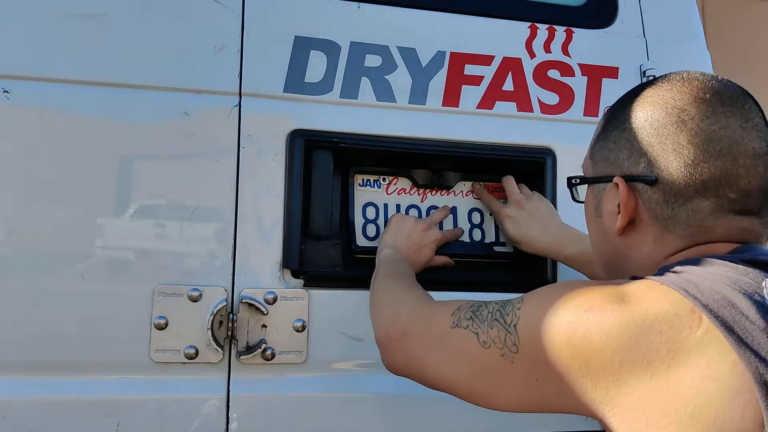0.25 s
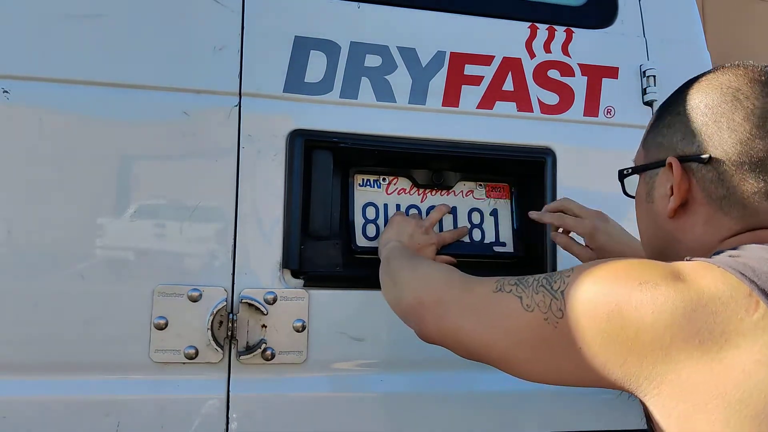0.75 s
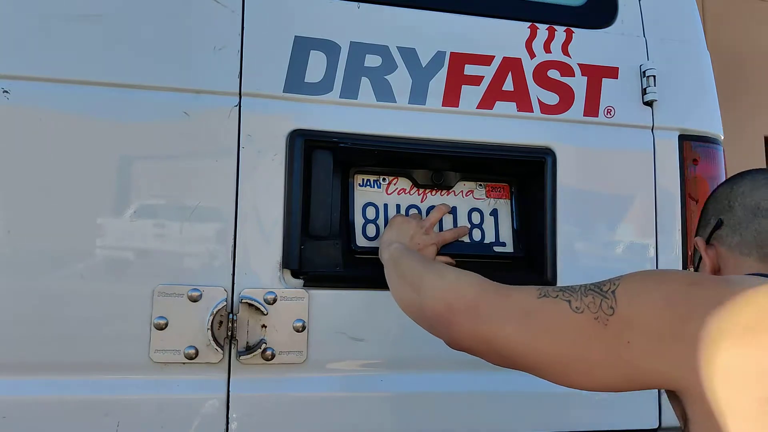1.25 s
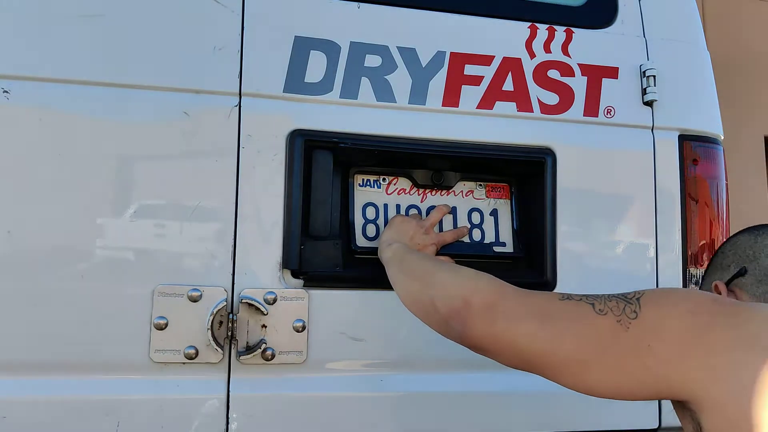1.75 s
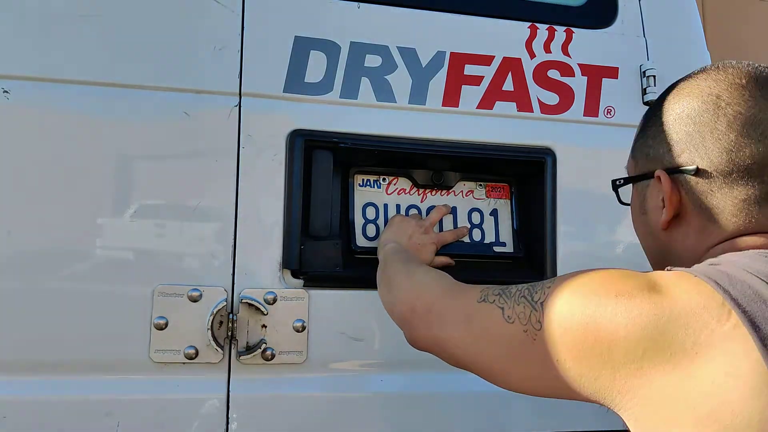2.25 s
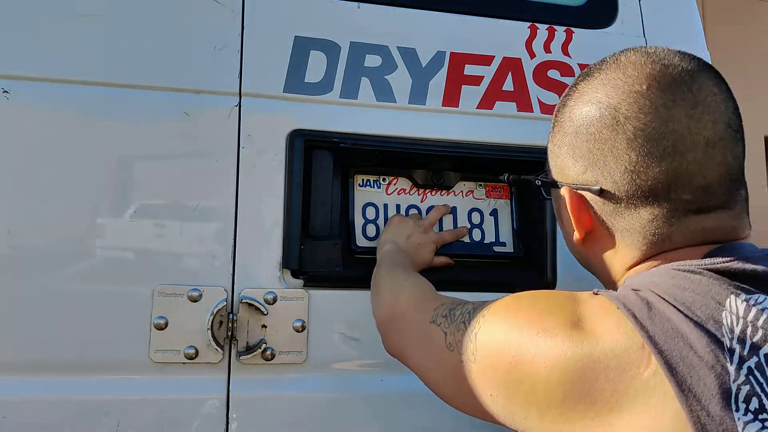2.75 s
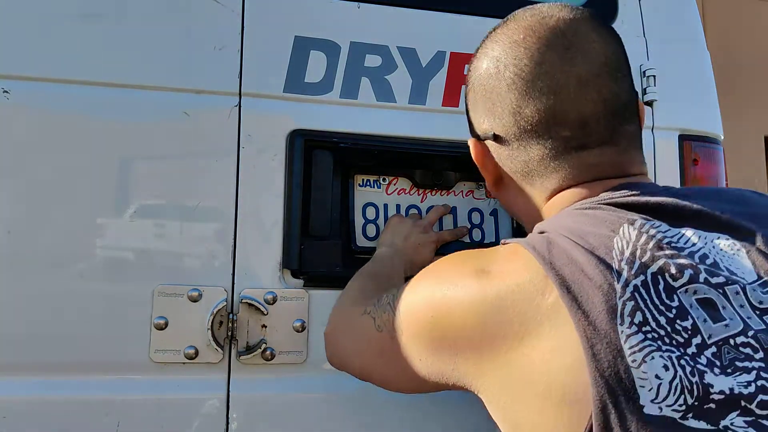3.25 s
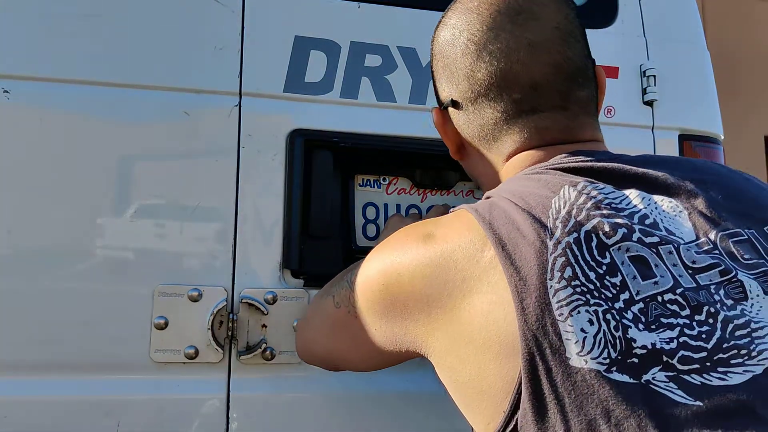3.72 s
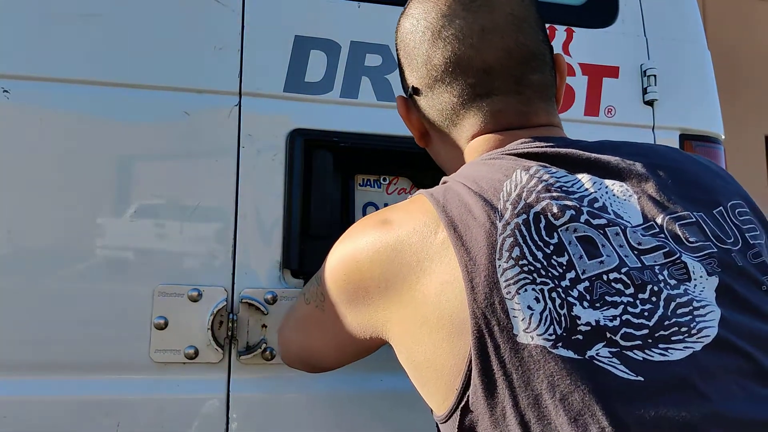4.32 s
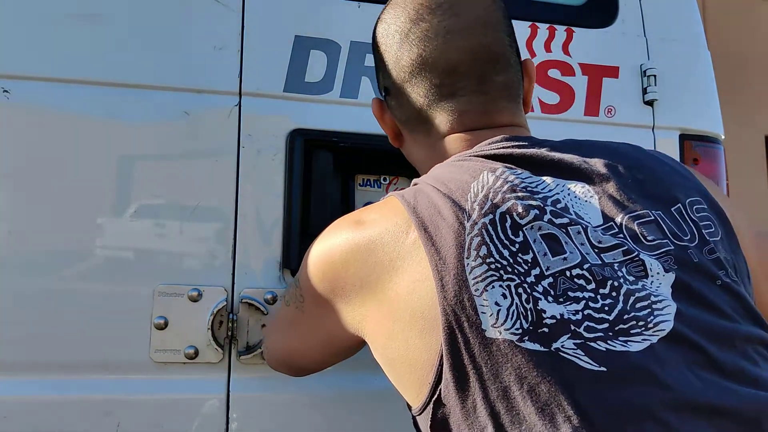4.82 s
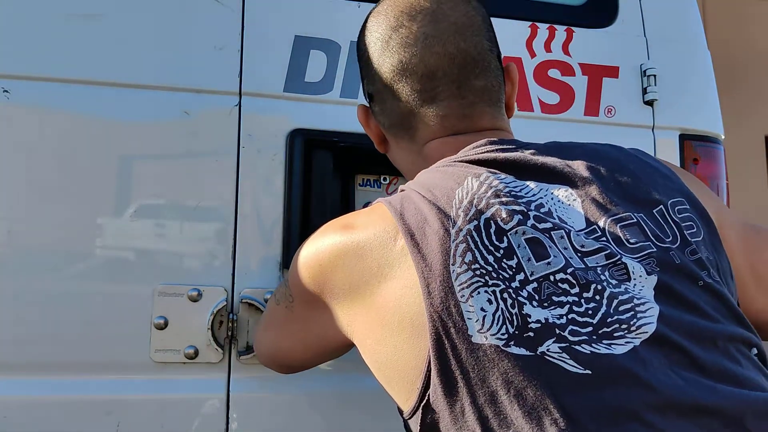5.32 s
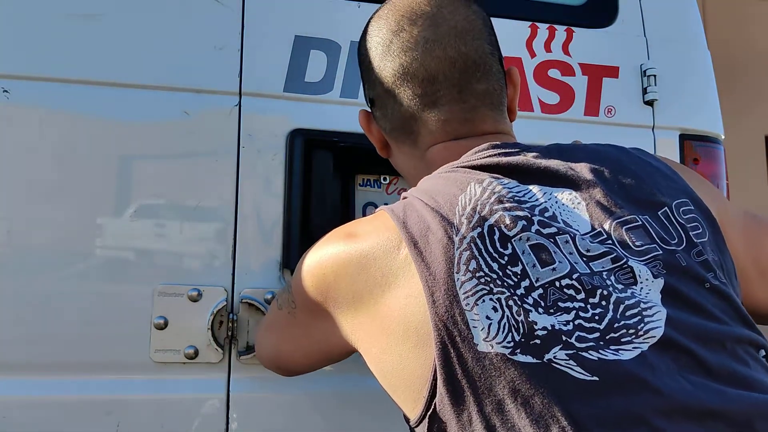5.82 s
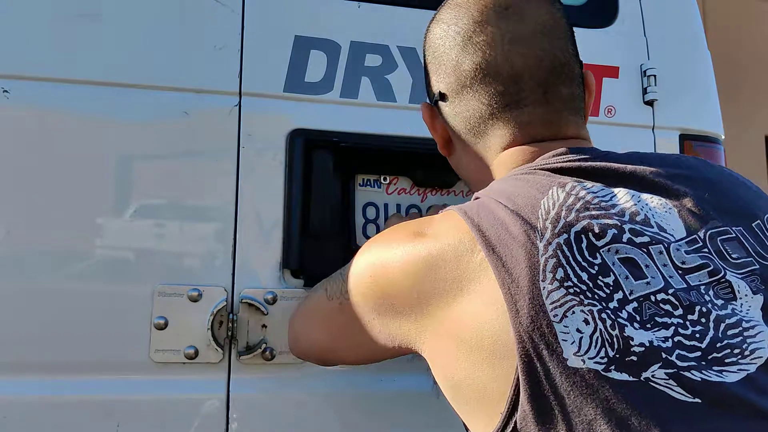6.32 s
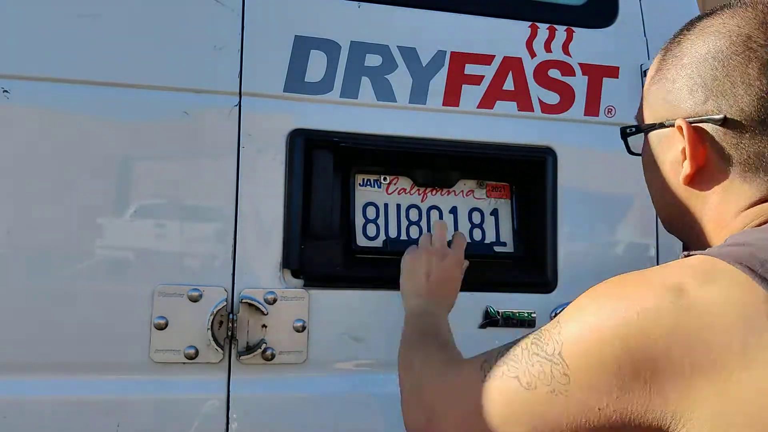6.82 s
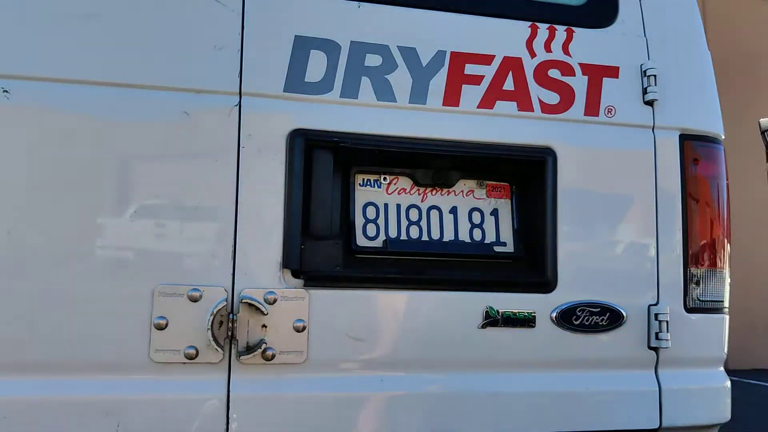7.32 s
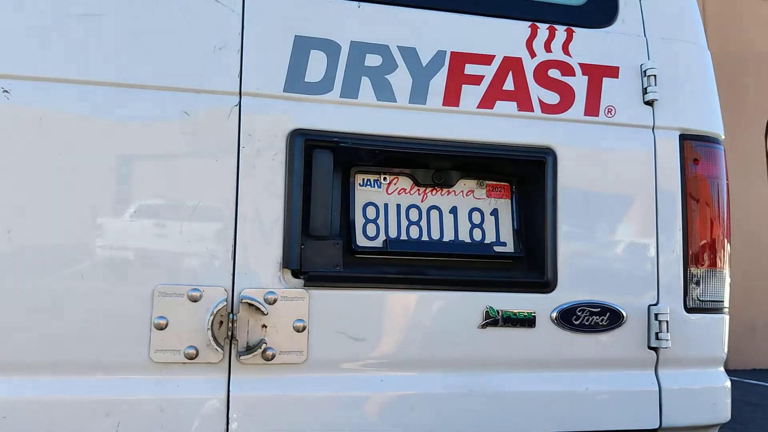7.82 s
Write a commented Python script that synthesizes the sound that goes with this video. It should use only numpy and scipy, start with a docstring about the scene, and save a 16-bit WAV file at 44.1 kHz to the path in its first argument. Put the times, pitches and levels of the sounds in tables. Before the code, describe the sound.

Outdoors, low distant traffic rumble runs throughout, with an engine drone easing off over the first three seconds. Close and slightly left, faint taps on a plate come at 0.1-0.4 s, then a flurry of small plastic clicks at 0.5-0.85 s, the last firmest. A soft knock at 1.4, a bright hard double clack at 1.96, sparse light knocks at 3.3-3.4 and 4.0-4.2. At 4.72 a bit clunks into a screw; at 4.76 an impact driver spins up quickly to a high whine, then sags and growls from 5.0 as the thread rasps and binds in rising scrapes. Short squeals at 5.75-5.93 lead to a light blow at 5.94 and three loud metallic bangs at 5.96-6.06, ringing the steel door. The motor coasts down from 6.1, with rattles and a sharp bit slip at 6.3. Faint rustles and knocks until 7.2, then rumble and two tiny ticks at 8.0.

```python
"""Licence plate frame screwed to a van door

A plastic licence plate frame clicks against a van's rear door outdoors, over low traffic rumble and engine drone.
A cordless impact driver clacks, seats on a screw and runs: motor harmonics sag over gear noise and thread rasp.
The screw scrapes and squeals, the hammer gives a light blow and three hard ones, the door rings, the bit slips off.
Contacts are decaying noise bands and struck modes; friction is noise through resonances; the door is decaying sines."""
import sys
import numpy as np
from scipy import signal
from scipy.io import wavfile

SR = 44100
rng = np.random.default_rng(int(sys.argv[2]) if len(sys.argv) > 2 else 0)


def materialize(psi):
    """Save the field psi as 16-bit PCM at rate SR to the path in sys.argv[1].

    A 1-D psi becomes a single channel; in a 2-D psi each row is a channel.
    """
    bounded = np.clip(np.atleast_2d(psi).T, -1, 1)
    quanta = np.round(bounded * 32767).astype(np.int16)
    wavfile.write(sys.argv[1], SR, quanta)


N = 355446
TIME = np.arange(N) / SR
# neighbouring noise bands, 0.4 octave each
EDGES = 22 * 2 ** (np.arange(25) * .4)
CENTRES = np.sqrt(EDGES[:-1] * EDGES[1:])
BANK = [signal.butter(2, pair, "band", fs=SR, output="sos") for pair in zip(EDGES, EDGES[1:])]

# stereo image of the near sounds: pitch_hz, left_right_likeness (-1 to 1)
NEAR_IMAGE = [(200, 0.99), (600, 0.91), (1100, 0.76), (3000, 0.23), (6000, .08), (12000, -0.2)]
# the bit drops into the screw head: start_s, level_db (relative), tilt_db_per_octave, t60_s (at 2 kHz)
SEAT_HITS = [(4.7215, -33, -4, 0.019), (4.7255, -23, 0.5, 0.064), (4.744, -40, -4.5, 0.09)]
# hammer blows: start_s, level_db (relative)
HAMMER_BLOWS = [(5.9387, -23.5), (5.959, -10), (6.0091, -10), (6.055, -9)]
# the thread binds in the plastic: peak_s, build_s, release_s (Gaussian spreads), level_db
THREAD_BINDS = [(5.055, 0.026, 0.033, -45.5), (5.232, 0.032, 0.03, -38), (5.442, 0.048, 0.018, -38.5),
                (5.659, 0.056, 0.026, -39), (5.803, 0.019, 0.015, -30.5), (5.908, .02, 0.019, -30)]

# trigger pulled, thread bites, head meets the frame, trigger let go, rotor at rest (s)
START_S, BITE_S, TIGHT_S, RELEASE_S, REST_S = 4.76, 4.958, 5.715, 6.095, 6.75


def from_db(db):
    """Decibels to gain."""
    return 10 ** (np.asarray(db) / 20)


def rms_one(x):
    """Scale to unit rms."""
    return x / np.sqrt(np.mean(x ** 2) + 1e-20)


def in_time(rows):
    """The columns of a curve at every sample."""
    s, *columns = np.transpose(rows)
    return [np.interp(TIME, s, column) for column in columns]


def during(start, end):
    """One between two moments, with 20 ms ramps inside the ends."""
    return np.clip(np.minimum(TIME - start, end - TIME) / .02, 0, 1)


def step(s, length):
    """A smooth rise from 0 to 1, centred on a moment."""
    return (1 + np.tanh(2 * (TIME - s) / length)) / 2


def stages(first, changes):
    """A value that glides to a new one at each change of (centre_s, length_s, value)."""
    out = first
    for s, length, value in changes:
        out = out + (value - out) * step(s, length)
    return out


def grip(s, build, release):
    """A bell that builds up to a moment and lets go, each at its own rate, as friction does."""
    spread = np.where(TIME < s, build, release)
    return np.exp(-np.minimum(((TIME - s) / spread) ** 2, 100) / 2)


def swells(rows):
    """Bell-shaped rises and falls of gain."""
    return sum(from_db(db) * grip(s, spread, spread) for s, spread, db in rows)


def at_hz(points, hz):
    """Read a spectrum on a log-frequency axis."""
    f, value = np.transpose(points)
    return np.interp(np.log(hz), np.log(f), value)


def band_gains(spectrum):
    """Amplitude of each band, falling steeply outside the spectrum; total power 1."""
    octaves_outside = np.abs(np.log2(CENTRES / np.clip(CENTRES, spectrum[0][0], spectrum[-1][0])))
    density = from_db(at_hz(spectrum, CENTRES) - 20 * octaves_outside)
    gains = density * np.sqrt(CENTRES)   # bands widen with pitch
    return gains / np.linalg.norm(gains)


def drift(rate):
    """Smooth random wandering of rms 1, with this many turning points per second at most."""
    knots = rng.standard_normal(8192)
    return rms_one(np.interp(TIME * rate, np.arange(len(knots)), knots))


def stereo(pair, likeness, hz):
    """Mix two unrelated noises into a left and right that are alike by a set amount."""
    alike = np.clip(at_hz(likeness, hz), -.99, .99)
    middle = np.sqrt((1 + alike) / 2) * pair[0]
    side = np.sqrt((1 - alike) / 2) * pair[1]
    return middle + side * [[1], [-1]]


def resonance(x, hz, width):
    """A two-pole band-pass with gain of about 1 on top."""
    r = np.exp(-np.pi * width / SR)
    numerator = np.array([1, 0, -1]) * (1 - r * r) / 2
    denominator = [1, -2 * r * np.cos(2 * np.pi * hz / SR), r * r]
    return signal.lfilter(numerator, denominator, x + 1e-18)


def noise(spectrum, likeness):
    """Coloured stereo noise of rms 1, built band by band."""
    white, out = rng.standard_normal((2, 2, N)), 0
    for k, gain in enumerate(band_gains(spectrum)):
        if gain > 1e-4:
            band = rms_one(signal.sosfilt(BANK[k], white[k % 2]))
            out = out + gain * stereo(band, likeness, CENTRES[k])
    return rms_one(out)


def struck(hz, width, angle, t):
    """One mode dying away after each contact, a little out of phase between left and right."""
    scatter, phase = rng.standard_normal((len(angle), 2)).T[:, :, None, None]
    force = from_db(1.2 * scatter)   # no two contacts strike a mode equally hard
    swing = force * 2 * np.pi * width / SR * np.exp(-np.pi * width * t)
    return swing * np.cos(2 * np.pi * (hz * t + phase) + angle[:, :, None] * [[.5], [-.5]])


def contacts(rows, colour, modes, level_db, mode_db, share, low_ring, tail_db, tail_t60):
    """Each contact rings the main modes and a crowd of short ones, lows longest, then a faint scatter from the yard."""
    t = np.arange(SR // 3) / SR
    s, db, tilt, t60 = np.transpose(rows)[:, :, None]
    # the same body rings much alike at every contact
    share = np.clip(share, 0, 1)
    common = rng.standard_normal((2, 2, len(t)))
    own = rng.standard_normal((len(rows), 2, 2, len(t)))
    crowd = np.sqrt(share) * common + np.sqrt(1 - share) * own
    hits, gains = 0, band_gains(colour)
    for k, (hz, gain) in enumerate(zip(CENTRES, gains)):
        if hz < colour[0][0] / 2:
            continue
        age = t * (hz / 2000) ** low_ring
        ring = from_db(-60 * age / np.maximum(t60, .004))
        tail = from_db(tail_db - 60 * age / tail_t60)
        band = signal.sosfilt(BANK[k], crowd[:, k % 2] * (ring + tail)[:, None])
        band /= np.sqrt(np.sum(band ** 2, axis=-1, keepdims=True) / (SR / 100))   # rms 1 if squeezed into 10 ms
        strength = gain * from_db(db + level_db + tilt * np.log2(hz / 2000))
        hits = hits + strength[:, None] * np.array([stereo(pair, NEAR_IMAGE, hz) for pair in band])
    # each main mode stands its own dB above the crowd around it
    crowd_height = gains * SR / np.sqrt(200 * np.diff(EDGES))
    for hz, width, above_db in modes:
        mode_level_db = db + level_db + mode_db + above_db + tilt * np.log2(hz / 2000)
        strength = np.interp(hz, CENTRES, crowd_height) * from_db(mode_level_db)
        angle = np.arccos(np.clip(at_hz(NEAR_IMAGE, hz), -1, 1)) * rng.choice([-1, 1], s.shape)
        hits = hits + strength[:, None] * struck(hz, width, angle, t)
    out = np.zeros((2, N + len(t)))
    for start, hit in zip((s[:, 0] * SR).astype(int), hits):
        out[:, start:start + len(t)] += hit
    return out[:, :N]


def rubbed(modes, grain):
    """Grainy friction rings a set of modes; rms 1."""
    slips = grain * rng.standard_normal((2, N))
    return rms_one(sum(from_db(db) * resonance(stereo(slips, NEAR_IMAGE, hz), hz, width)
                       for hz, width, db in modes))


def street():
    """Distant traffic as coloured noise; idling engines drone as noise through narrow resonances."""
    # traffic spectrum: pitch_hz, level_db (relative)
    traffic_colour = [(12, -33), (20, -1), (55, -3.5), (74, -6), (127, -12.5), (146, -22), (182, -17),
                      (262, -26), (301, -27), (485, -31), (624, -28.5), (1260, -41), (7950, -61),
                      (14700, -58), (16000, -59)]
    # traffic loudness: time_s, level_db
    traffic_level = [(0.0, -39), (8.06, -42)]
    # engine drones: pitch_hz, width_hz (of each of two passes), level_db (before the early rise)
    engine_hums = [(45.6, 14.1, -44), (70.8, 12, -46.5), (117.57, 9.4, -49)]
    # stereo image of the distance: pitch_hz, left_right_likeness (-1 to 1)
    far_image = [(60, 0.98), (180, 0.9), (550, 0.25), (1650, -0.36), (4970, -0.048), (15000, 0.11)]
    db, = in_time(traffic_level)
    hum_db = 4.5 * (1 - step(1.5, 2.9))   # the drone starts louder and eases off
    hum = 0
    for hz, width, level in engine_hums:
        white = rng.standard_normal(N + SR)   # the first second lets the resonances settle
        narrow = resonance(resonance(white, hz, width), hz, width)[SR:]
        hum = hum + from_db(level) * rms_one(narrow)
    return from_db(db) * noise(traffic_colour, far_image) + from_db(hum_db) * hum


def plate_taps():
    """Fingers tap the plate against the door, ringing the plate's modes."""
    # taps: start_s, level_db (relative), tilt_db_per_octave, t60_s (at 2 kHz)
    tap_hits = [(0.1205, -61.5, -8, .04), (0.261, -40.5, 1, 0.043), (0.346, -42.5, -4.5, .05),
                (0.376, -39.5, 1.5, 0.054)]
    # tap spectrum: pitch_hz, level_db (relative)
    tap_colour = [(250, -6), (600, -10), (1000, -3), (1600, -2.5), (2000, -5), (2500, -2), (3000, -4),
                  (3600, -11), (5000, -7), (6200, -11.5), (7500, -13), (10000, -20.5), (15000, -20),
                  (16000, -36)]
    # plate modes: pitch_hz, width_hz, level_db (relative to the crowd)
    plate_modes = [(683, 15, 17), (990, 50, 0), (2410, 57, 12.5), (2700, 74, 9), (2980, 82, 3),
                   (4230, 130, 0), (5350, 110, 0), (6400, 72, 4)]
    return contacts(tap_hits, tap_colour, plate_modes, level_db=2.0, mode_db=0.0,
                    share=0.4, low_ring=0.36, tail_db=-26.0, tail_t60=0.19)


def rustles_and_scrapes():
    """Cloth rustles, and faint scrapes come before the bit seats and before it slips: swells of coloured noise."""
    # rustles and faint scrapes: peak_s, spread_s (Gaussian), level_db
    rustle_swells = [(.13, 0.0072, -62), (.22, 0.078, -64), (.54, 0.089, -65), (.92, .03, -66),
                     (2.05, 0.031, -64), (4.695, 0.019, -56.5), (6.17, .05, -54), (6.245, 0.017, -60),
                     (6.284, 0.014, -54.5), (6.65, 0.032, -63.5), (6.8, 0.33, -71), (7.21, 0.061, -67.5)]
    # their spectrum: pitch_hz, level_db (relative)
    rustle_colour = [(1000, -2), (2000, -1.5), (4000, -9.5), (6000, -1), (8000, -13), (15000, -21)]
    return swells(rustle_swells) * noise(rustle_colour, NEAR_IMAGE)


def clicks_and_ticks():
    """The screw clicks in the frame, and two faint bright ticks come at the end; the firmer, the shorter."""
    # clicks and ticks: start_s, level_db (relative), tilt_db_per_octave
    click_hits = [(0.504, -53, -5), (0.515, -44, -0.5), (0.53, -45, -2), (0.541, -55, -9),
                  (0.551, -54.5, -11), (0.565, -42.5, -2), (0.579, -66, -12), (0.594, -38.5, -2.5),
                  (0.643, -36.5, 1.5), (0.666, -47.5, -3), (0.7086, -32.5, 2.5), (0.845, -28, -0.5),
                  (8.003, -64, 8.5), (8.024, -65.5, 6.5)]
    # click spectrum: pitch_hz, level_db (relative)
    click_colour = [(290, -18), (500, -16), (900, -10.5), (1400, -7.5), (2100, -3), (2850, -9.5),
                    (3750, -8), (4530, -9.5), (5550, -1.5), (7310, -14.5), (8580, -15), (13300, -26),
                    (14900, -27), (16000, -36)]
    # frame modes: pitch_hz, width_hz, level_db (relative to the crowd)
    frame_modes = [(834, 70, 1.5), (1360, 86, 6), (1650, 100, 5), (2010, 150, 4), (2280, 82, 6),
                   (2600, 50, 5.5), (3160, 160, -2.5), (4080, 46, 5.5), (5090, 80, 5), (5470, 110, 4.5),
                   (5620, 110, 9.5), (6350, 80, 5)]
    # a firm click is damped by the hand, a light one rattles on
    light_db, firm_db = -42, -37
    light_t60_s, firm_t60_s = 0.06, 0.037
    rows = [(s, db, tilt, np.interp(db, [light_db, firm_db], [light_t60_s, firm_t60_s]))
            for s, db, tilt in click_hits]
    return contacts(rows, click_colour, frame_modes, level_db=1.0, mode_db=1.0,
                    share=0.5, low_ring=0.42, tail_db=-25.5, tail_t60=0.23)


def knocks_and_rattles():
    """Light knocks of the bit, the bright click of trigger or chuck, and rattles after release."""
    # knocks, click and rattles: start_s, level_db (relative), tilt_db_per_octave, t60_s (at 2 kHz)
    knock_hits = [(1.433, -56, -2.5, 0.03), (3.3195, -45.5, -3, 0.083), (3.378, -48, -3.5, 0.11),
                  (3.398, -52.5, -3, 0.1), (3.976, -41.5, 0, 0.064), (4.007, -49.5, -2.5, 0.058),
                  (4.13, -52.5, -2.5, 0.075), (4.194, -39, -2, 0.12), (4.21, -39, 3, 0.049),
                  (4.8195, -35.5, 7, 0.028), (6.15, -44, -6, 0.13), (6.181, -41, 2.5, 0.088),
                  (6.234, -45.5, 0, 0.11), (6.68, -53, 2, 0.07), (6.78, -58, 1.5, 0.07)]
    # knock spectrum: pitch_hz, level_db (relative)
    knock_colour = [(150, -0.5), (260, 2.5), (450, -8), (680, -1), (1000, -9), (1400, -5.5), (2200, -15),
                    (3200, -17.5), (4300, -19.5), (5800, -15), (8000, -37), (15000, -50)]
    # modes that ring at each: pitch_hz, width_hz, level_db (relative to the crowd)
    knock_modes = [(367, 20, 4), (550, 14, 8), (688, 20, 10), (930, 32, 9), (1593, 39, 4), (2110, 140, 1)]
    return contacts(knock_hits, knock_colour, knock_modes, level_db=0.0, mode_db=0.5,
                    share=0.4, low_ring=0.45, tail_db=-30, tail_t60=0.19)


def driver_clacks():
    """The driver clacks as it is picked up, ringing its housing."""
    # clacks: start_s, level_db (relative), tilt_db_per_octave, t60_s (at 2 kHz)
    clack_hits = [(1.958, -25, 0.44, 0.051), (1.9725, -29.5, -0.1, 0.033)]
    # clack spectrum: pitch_hz, level_db (relative)
    clack_colour = [(180, -40), (300, -4.5), (511, -27), (678, -6.5), (842, -14.5), (1410, 1.5), (1690, -6),
                    (2170, -4.5), (2360, -3.5), (3290, -13.5), (5800, 4), (9390, -23.5), (15200, -17),
                    (16000, -38)]
    # housing modes: pitch_hz, width_hz, level_db (relative to the crowd)
    housing_modes = [(674, 41, 7), (980, 46, 1.5), (1406, 110, 5), (2170, 75, 5.5), (4840, 160, 5),
                     (5900, 200, 7.5), (6000, 71, 4.5)]
    return contacts(clack_hits, clack_colour, housing_modes, level_db=2.0, mode_db=1.0,
                    share=0.4, low_ring=0.23, tail_db=-38.5, tail_t60=0.65)


def bit_seating():
    """The bit drops into the screw head with a clunk, ringing the screw."""
    # seating spectrum: pitch_hz, level_db (relative)
    seat_colour = [(150, 0), (230, -1.5), (480, -4.5), (700, -2), (880, -7.5), (1400, -9.5), (1900, -13),
                   (2300, -9.5), (3200, -10.5), (4200, -12), (5400, -17), (8000, -27), (14500, -33)]
    # screw modes: pitch_hz, width_hz, level_db (relative to the crowd)
    screw_modes = [(352, 24, 2), (620, 30, 2), (730, 30, 12), (990, 62, 1), (1167, 37, 7.5), (1530, 36, 6),
                   (1770, 40, 4), (2070, 40, 3), (2200, 110, 6), (2640, 38, 7), (3180, 210, 6),
                   (5500, 92, 0)]
    return contacts(SEAT_HITS, seat_colour, screw_modes, level_db=-1.5, mode_db=-1.0,
                    share=0.23, low_ring=0.31, tail_db=-28.5, tail_t60=0.54)


def door(rows, level_db):
    """Blows set the steel panel ringing; their energies add up in each mode."""
    # sheet steel modes: pitch_hz, level_db (relative to the blow), t60_s
    panel_modes = [(38.45, -15, .35), (60.6, -27, 0.4), (188.4, -27, 0.73), (218, -20.5, 0.32),
                   (260.3, -26, .35), (299.4, -30.5, 0.79), (354, -31.5, 1.15), (375.3, -25, 0.45),
                   (389, -20.5, 0.18), (538, -28.5, .25), (638, -28.5, 0.42), (747, -27.5, 0.17)]
    out = 0
    for hz, db, t60 in panel_modes:
        kicks = np.zeros(N)
        kicks[[int(row[0] * SR) for row in rows]] = from_db(np.array(rows)[:, 1] + level_db + db) ** 2
        energy = signal.lfilter([1], [1, -from_db(-120 / (t60 * SR))], kicks + 1e-18)
        swing = signal.lfilter([.01], [1, -.99], np.sqrt(energy))   # softens the onset
        wander = 0.7 * drift(22)   # radians
        out = out + swing * np.sin(2 * np.pi * (hz * TIME + rng.random()) + wander)
    return out


def motor_speed():
    """The motor runs up, sags unevenly under load and coasts down once the trigger is let go."""
    # motor speed before the run-down: time_s, speed_turns_per_s
    speed_curve = [(4.76, 300), (4.86, 400), (5.03, 384), (5.09, 376), (5.135, 310), (5.235, 299),
                   (5.295, 265), (5.325, 256), (5.4, 262), (5.432, 242), (5.465, 214), (5.51, 241),
                   (5.595, 243), (5.655, 230), (5.7, 244), (5.87, 254), (6.095, 256)]
    speed, = in_time(speed_curve)
    coast_s = 0.19   # time constant
    return speed * np.exp(-np.maximum(TIME - RELEASE_S, 0) / coast_s)


def drive_levels():
    """Level of motor and gears, and of the thread, rising with the load and dying away with the rotor."""
    bite_rise_s, load_change_s = 0.1, .025   # the thread takes hold gradually, later changes are abrupt
    gear_db = stages(-45, [(BITE_S, bite_rise_s, -39.5), (TIGHT_S, load_change_s, -35.5),
                           (HAMMER_BLOWS[0][0], load_change_s, -26), (RELEASE_S, load_change_s, -46)])
    thread_db = stages(-57, [(BITE_S, bite_rise_s, -45.5), (TIGHT_S, load_change_s, -37),
                             (RELEASE_S, load_change_s, -69)])
    fade_db = 27 * np.maximum(TIME - RELEASE_S, 0)   # dB per s of coasting
    binding = sum(grip(s, build, release) for s, build, release, _ in THREAD_BINDS)
    bind_dip_db = 1.5   # the rasp sinks a little at each bind
    return gear_db - fade_db, thread_db - bind_dip_db * binding - fade_db


def motor_whine():
    """Harmonics of the motor speed, each flaring, roughened by the gear teeth and wandering in phase."""
    # strength of a harmonic by its pitch: pitch_hz, level_db (relative)
    whine_colour = [(230, -11.5), (480, -10.5), (690, -5.5), (820, -11), (950, -4), (1050, -2),
                    (1230, -1.5), (1420, -4), (1560, -5), (1800, -13), (2080, -9), (2450, -11.5),
                    (3050, -10), (3400, -14.5), (6000, -23.5)]
    # the harmonics stand out as the motor takes up the load, then sink: time_s, level_db (relative)
    whine_level = [(4.85, -16), (5.02, -7), (5.1, -3), (5.27, -4), (5.36, -6), (5.66, -5), (5.9, -8)]
    flutter_db, grit_db, phase_wander = 4, 2.5, 0.28   # dB, dB, radians
    speed = motor_speed()
    phase = 2 * np.pi * np.cumsum(speed * (1 + .008 * drift(120))) / SR
    whine = 0
    for k in range(1, 15):
        harmonic_db = at_hz(whine_colour, k * speed + 1) + flutter_db * drift(34) + grit_db * drift(220)
        whine = whine + from_db(harmonic_db) * np.sin(k * phase + phase_wander * drift(110))
    level_db, = in_time(whine_level)
    fade_db = 91.5 * np.maximum(TIME - RELEASE_S, 0)   # the unpowered motor soon falls silent
    return whine * from_db(level_db - 3.0 - fade_db)


def driver():
    """Motor harmonics over gear noise; the turning thread rasps in the plastic."""
    # gear noise spectrum: pitch_hz, level_db (relative)
    gear_colour = [(88, -35), (150, 3.5), (302, 1), (425, -4.5), (665, 5.5), (821, -3.5), (1220, 1.5),
                   (1930, -9), (3500, -17), (4550, -35), (7700, -120)]
    # thread rasp spectrum: pitch_hz, level_db (relative)
    thread_colour = [(1060, -41), (1800, -15), (2260, -9), (2480, -6.5), (3410, -5.5), (4290, -12.5),
                     (5850, -5.5), (7910, -15.5), (14300, -21), (16000, -35.5)]
    # the thread runs slack just before the head meets the frame: centre_s, spread_s (Gaussian), depth_db
    slack_dip = (5.703, 0.027, 5.2)
    gear_db, friction_db = drive_levels()
    gears = from_db(gear_db) * (motor_whine() + from_db(-7) * noise(gear_colour, NEAR_IMAGE))
    # the thread grips in fine grains and slower surges
    grain = from_db(2.2 * drift(600) + 1.0 * drift(50))
    s, spread, depth_db = slack_dip
    rasp_db = friction_db - depth_db * grip(s, spread, spread)
    rasp = from_db(rasp_db) * grain * noise(thread_colour, NEAR_IMAGE)
    return during(START_S, REST_S) * (gears + rasp)


def thread_scrapes():
    """At each bind the thread stutters, rings the frame and sweeps upward; the plastic groans as it lets go."""
    # frame modes at a bind: pitch_hz, width_hz, level_db (relative)
    bind_modes = [(2160, 82, -10), (2310, 100, -1), (2780, 140, -4), (3000, 58, 0.5), (3464, 140, -1),
                  (3925, 130, -7), (5017, 300, -8), (6000, 230, -4.5)]
    # groans: peak_s, spread_s (Gaussian), level_db
    groan_swells = [(5.11, 0.012, -46), (5.265, 0.013, -45), (5.472, 0.033, -39.5), (5.732, .019, -35)]
    # groaning plastic: pitch_hz, width_hz, level_db (relative)
    groan_modes = [(678, 22, 5.5), (860, 96, -4), (1025, 84, -3), (1400, 150, -10)]
    sweep_hz, width_hz, rise_hz_per_s, sweep_db = 5570, 980, 13000, -2.5
    stutter = rms_one(from_db(1.5 * drift(100) + 2 * drift(700)))
    ringing = rubbed(bind_modes, stutter)
    lowpass = signal.butter(2, width_hz / 2, fs=SR, output="sos")
    hiss = []
    for _ in range(2):
        white = stereo(rng.standard_normal((2, N)), NEAR_IMAGE, sweep_hz)
        hiss.append(stutter * rms_one(signal.sosfilt(lowpass, white)))
    out = 0
    for s, build, release, db in THREAD_BINDS:
        # slow noise on a rising carrier: a noise band that climbs through the bind
        phase = 2 * np.pi * (TIME - s) * (sweep_hz + rise_hz_per_s * (TIME - s) / 2)
        sweep = hiss[0] * np.cos(phase) + hiss[1] * np.sin(phase)
        out = out + from_db(db) * grip(s, build, release) * (ringing + from_db(sweep_db) * sweep)
    return out + swells(groan_swells) * rubbed(groan_modes, stutter)


def squeal(curve):
    """The tightening screw sticks and slips unevenly; the pitch, level and tilt of its harmonics bend along a curve."""
    # harmonics of the squeal: multiple, level_db (relative)
    squeal_harmonics = [(1, -4), (2, 0.5), (3, -2.5), (4, 4.5), (5, -0.5), (6, 2), (7, -5), (9, -8),
                        (10, 1.5), (11, 1), (12, -10.5)]
    pitch, db, tilt, jitter = in_time(curve)
    phase = 2 * np.pi * np.cumsum(pitch * (1 + jitter * drift(500))) / SR
    on = during(curve[0][0], curve[-1][0])
    live, tone = on > 0, np.zeros(N)
    for k, level in squeal_harmonics:
        flutter_db = 3 * drift(220)[live]
        gain = from_db(level + tilt[live] * np.log2(k) + flutter_db)
        tone[live] += gain * np.sin(round(k) * phase[live] + rng.uniform(0, 2 * np.pi))
    return on * from_db(db) * tone


def screw_squeals():
    """The screw squeals twice in the plastic."""
    # one curve a squeal: time_s, pitch_hz, level_db (relative), tilt_db_per_octave, pitch_jitter (share)
    squeal_curves = [
        [(5.738, 530, -50, -7, 0.022), (5.762, 542.3, -28.5, -10.5, 0.015), (5.783, 564.6, -36.5, -0.5, .01),
         (5.803, 562.7, -43.5, 4.5, 0.0062), (5.819, 570.3, -28, -6, 0.013), (5.838, 563, -32.5, -5.5, 0.019),
         (5.864, 540, -52, -8, .03)],
        [(5.87, 479, -52, -8, .02), (5.89, 500, -37, 0.5, 0.02), (5.91, 493, -42, 0, .03),
         (5.932, 467, -37, 2, 0.033)],
    ]
    return sum(squeal(curve) for curve in squeal_curves)


def hammering():
    """Each blow and the hammer's fall back on the anvil as contacts; the harder, the brighter."""
    rebound_s, rebound_db, t60_s = .028, -14.5, 0.088
    hardest_tilt_db, brighter_per_db = 1.81, 0.3167   # dB per octave; tilt gained per dB of force
    hits = list(HAMMER_BLOWS) + [(s + rebound_s, db + rebound_db) for s, db in HAMMER_BLOWS]
    hardest = max(db for _, db in HAMMER_BLOWS)
    return [(s, db, hardest_tilt_db + brighter_per_db * (db - hardest), t60_s) for s, db in hits]


def hammer_blows():
    """The hammer strikes the anvil and rings its modes."""
    # blow spectrum: pitch_hz, level_db (relative)
    blow_colour = [(59, -33), (100, -4), (143, -15.5), (202, -1), (295, -3.5), (381, -4.5), (470, -7.5),
                   (600, -4.5), (800, -7.5), (1360, -8.5), (2300, -7.5), (3120, -11), (4400, -11),
                   (5750, -8.5), (8110, -26.5), (14100, -19), (16000, -32)]
    # anvil modes: pitch_hz, width_hz, level_db (relative to the crowd)
    anvil_modes = [(367.4, 40, 6.5), (553.6, 43, 7.5), (650, 39, 9.5), (760, 33, 8), (960, 59, 8.5),
                   (1254, 26, 6.5), (1456, 24, 6.5), (1587, 26.4, 4), (2313, 92, 6), (3156, 45, 10.5),
                   (3450, 130, 2.5), (4910, 90, -1), (5660, 97, 8.5), (6240, 170, 4.5)]
    return contacts(hammering(), blow_colour, anvil_modes, level_db=-2.0, mode_db=-1.0,
                    share=0.24, low_ring=0.11, tail_db=-29.0, tail_t60=0.47)


def bit_slips():
    """The bit slips out of the screw head and rings."""
    # slips: start_s, level_db (relative), tilt_db_per_octave, t60_s (at 2 kHz)
    slip_hits = [(6.301, -35, -0.5, 0.092), (6.3075, -28.5, 1.5, 0.054)]
    # slip spectrum: pitch_hz, level_db (relative)
    slip_colour = [(150, -6), (260, -4.5), (420, -8.5), (600, -3), (900, -0.5), (1200, -6), (1530, -9),
                   (2670, -8.5), (4880, -15), (6740, -9), (7990, -23), (14600, -14), (16000, -32)]
    # bit modes: pitch_hz, width_hz, level_db (relative to the crowd)
    bit_modes = [(546, 18, 6), (880, 88, 2), (990, 45, 6.5), (1414, 62, 5.5), (2620, 240, 3),
                 (6800, 330, 3), (14300, 250, 7)]
    return contacts(slip_hits, slip_colour, bit_modes, level_db=0.6, mode_db=-1.5,
                    share=0.085, low_ring=0.49, tail_db=-31.0, tail_t60=0.6)


def lean_left(x):
    """Pan bass and treble slightly to the left, each by its own amount."""
    split_hz, bass_db, treble_db = 1800, 0.75, 0.7   # dB up on the left and down on the right
    bass = signal.sosfilt(signal.butter(1, split_hz, fs=SR, output="sos"), x + 1e-18)
    sides = np.array([[1], [-1]])
    return bass * from_db(bass_db * sides) + (x - bass) * from_db(treble_db * sides)


def scene():
    """The work on the door, slightly to the left, over the street."""
    handling = plate_taps() + rustles_and_scrapes() + clicks_and_ticks() + knocks_and_rattles() + driver_clacks()
    driving = bit_seating() + driver() + thread_scrapes() + screw_squeals() + hammer_blows() + bit_slips()
    panel = door(SEAT_HITS, level_db=0.5) + door(hammering(), level_db=3.5)
    return lean_left(handling + driving + panel) + street() * from_db([[.4], [-.4]])


def record(dry):
    """The microphone ports dull the upper treble, the loudest peaks are clipped and the top is cut."""
    # dip in the treble: pitch_hz, width_hz, depth (0 to 1)
    port_dip = (7600, 1200, 0.37)
    hz, width, depth = port_dip
    dulled = dry - np.clip(depth, 0, 1) * resonance(dry, hz, width)
    heard = np.clip(dulled, -1, 1)
    cutoff_hz = 15800
    return signal.sosfilt(signal.ellip(10, .1, 70, cutoff_hz, fs=SR, output="sos"), heard)


dry = scene()
out = record(dry)
materialize(out)
```